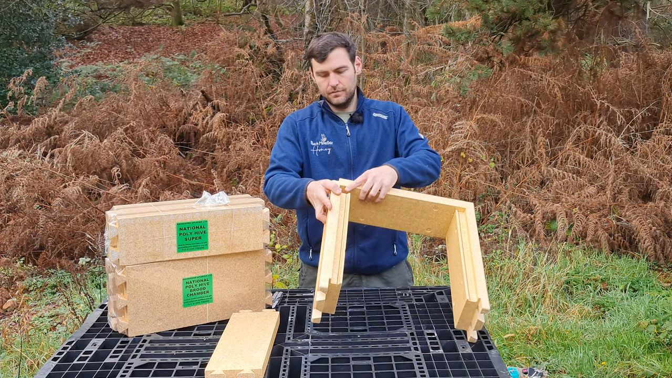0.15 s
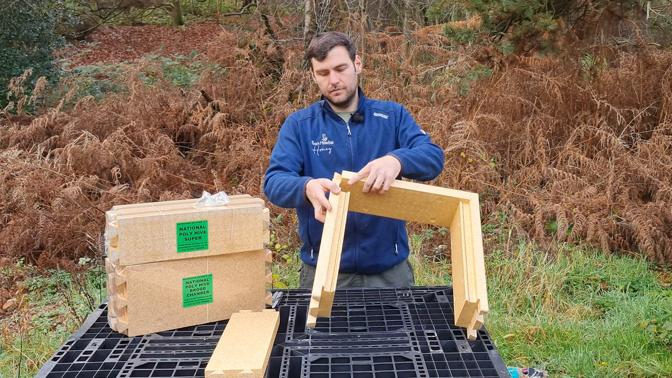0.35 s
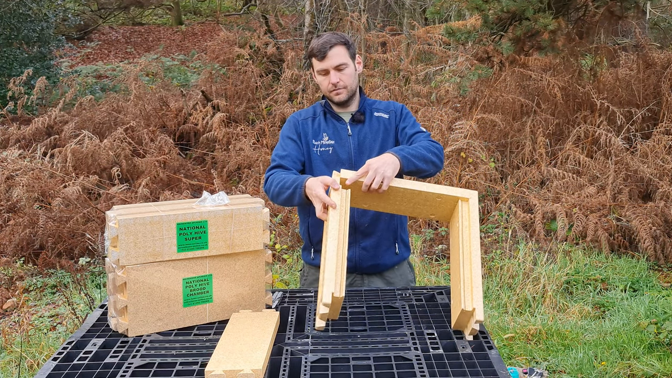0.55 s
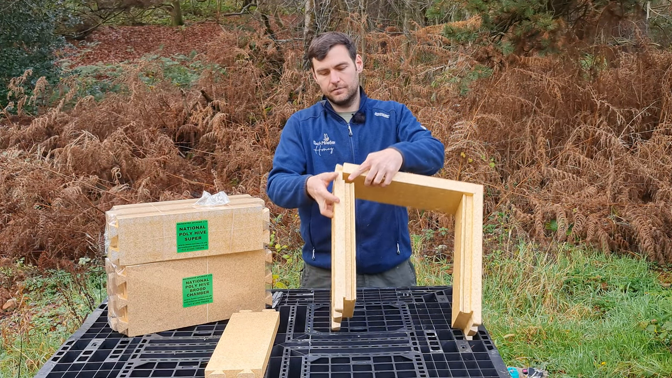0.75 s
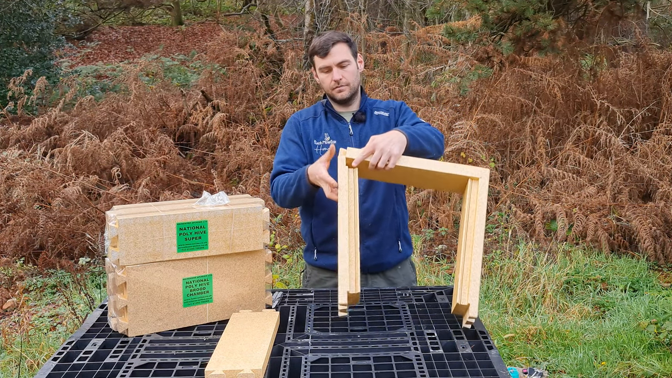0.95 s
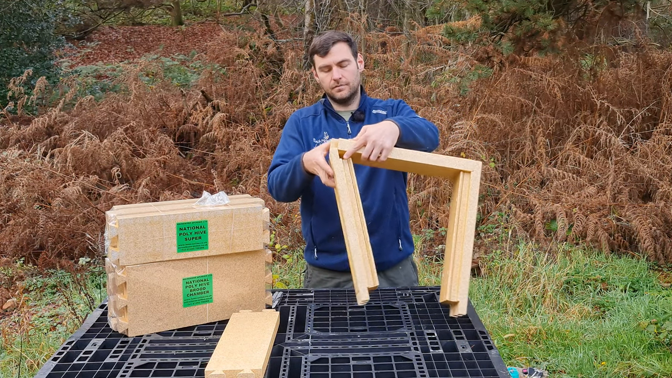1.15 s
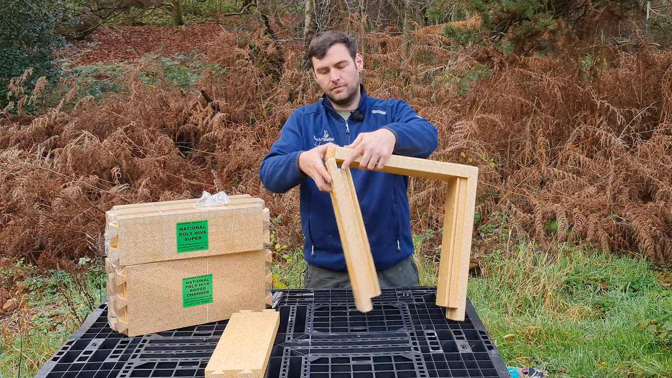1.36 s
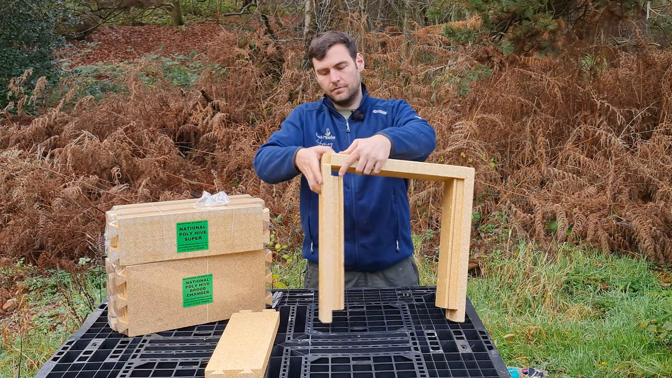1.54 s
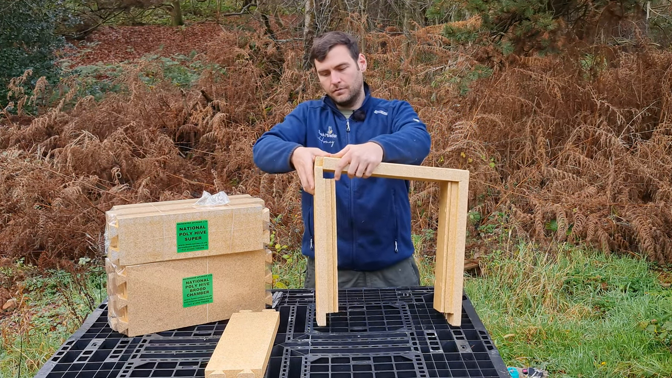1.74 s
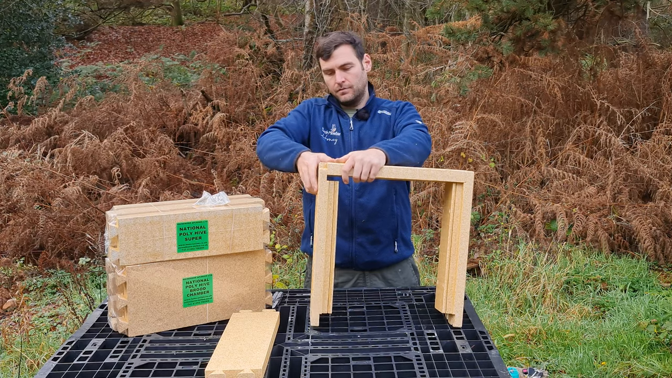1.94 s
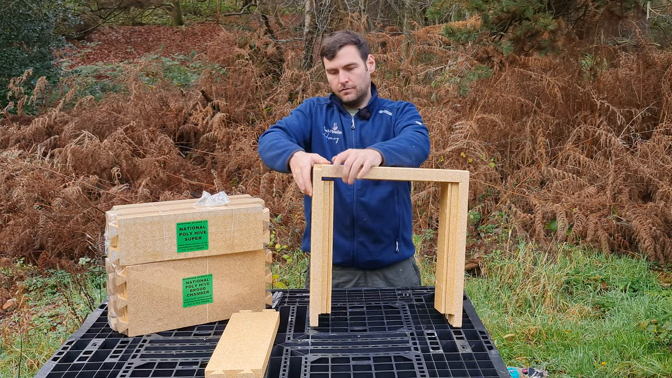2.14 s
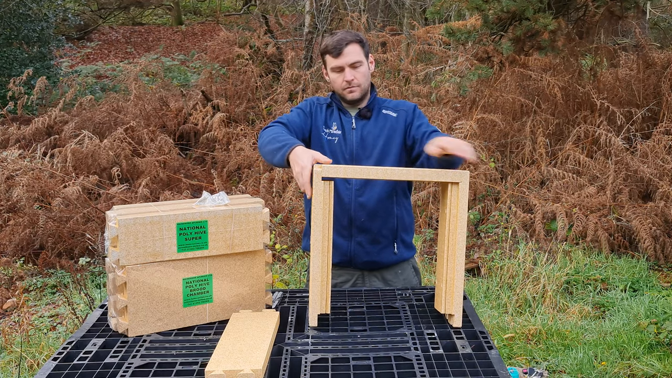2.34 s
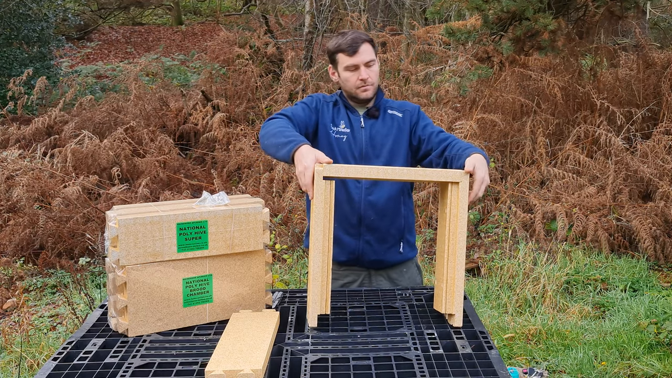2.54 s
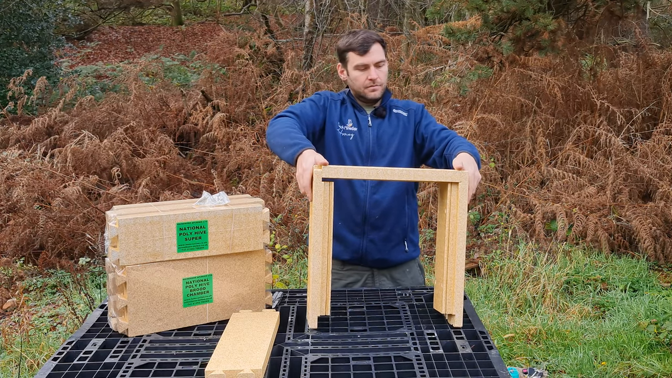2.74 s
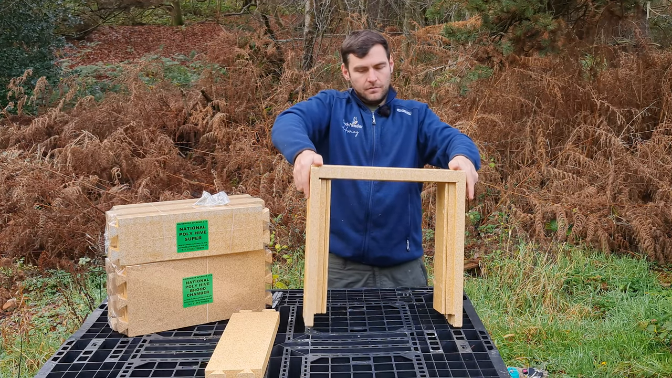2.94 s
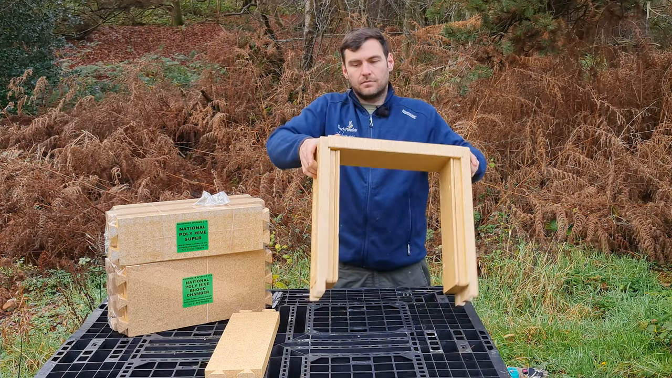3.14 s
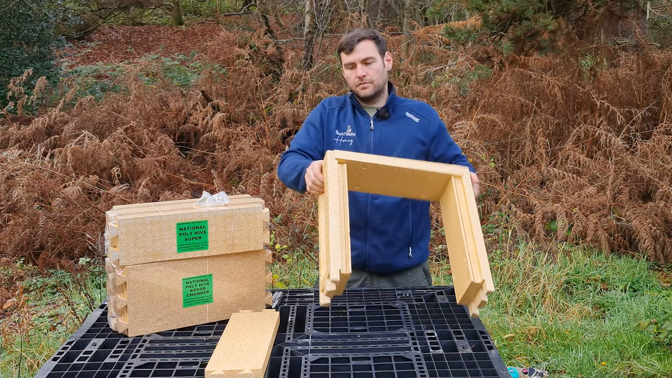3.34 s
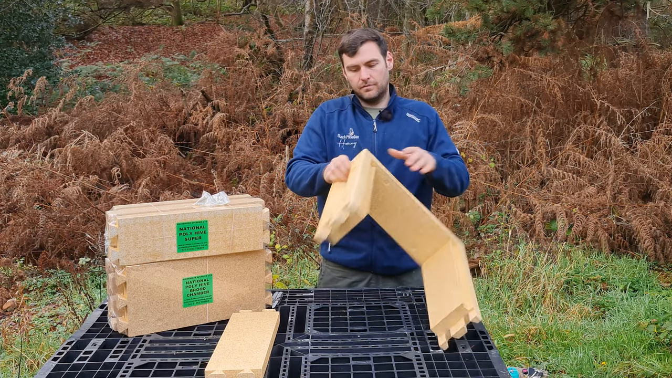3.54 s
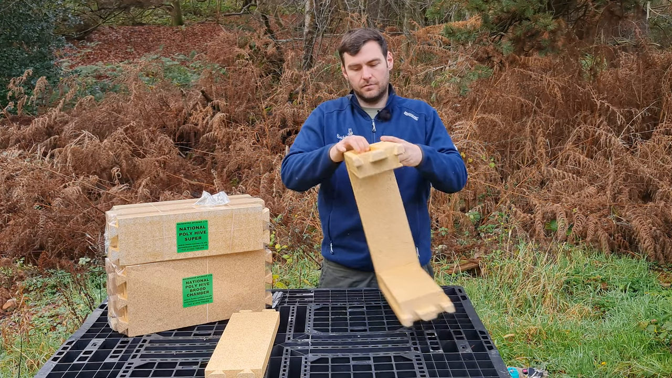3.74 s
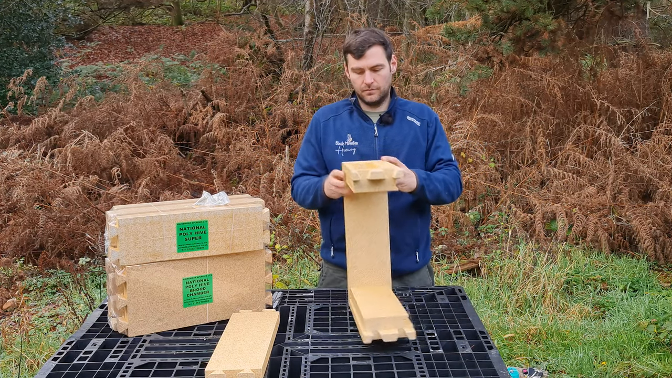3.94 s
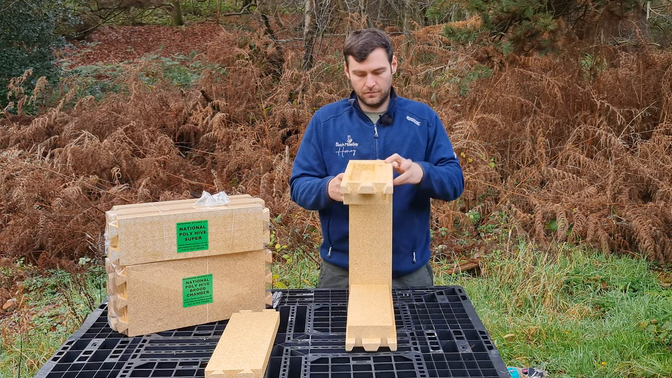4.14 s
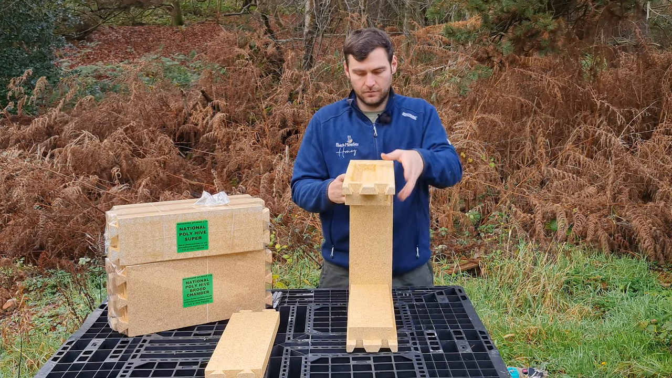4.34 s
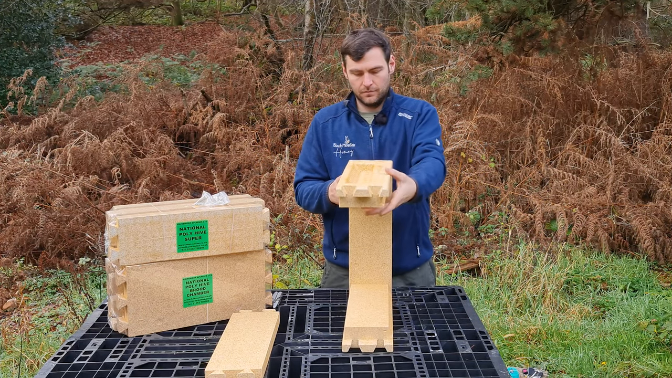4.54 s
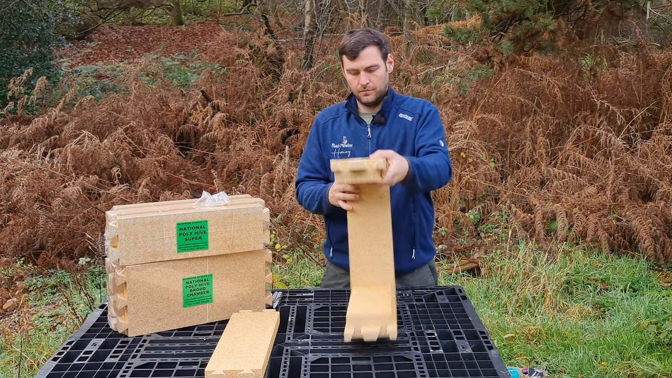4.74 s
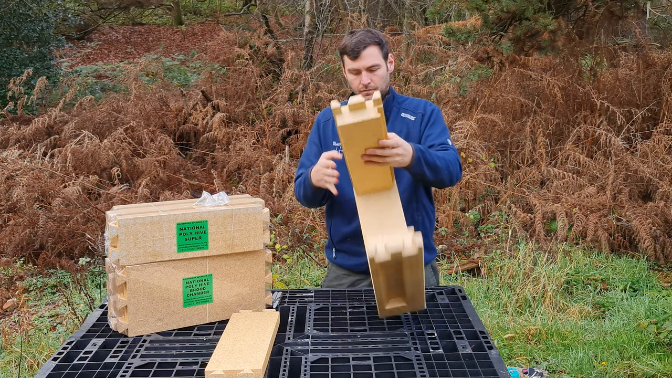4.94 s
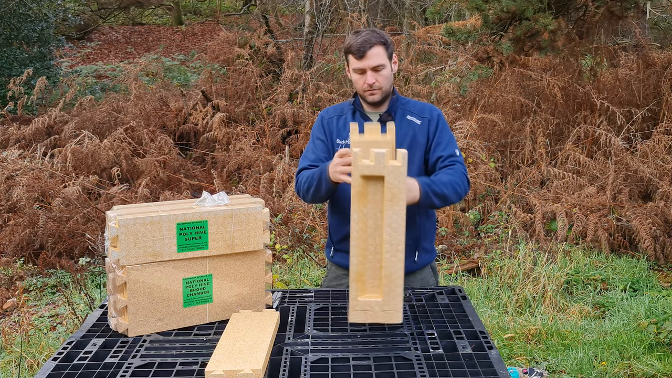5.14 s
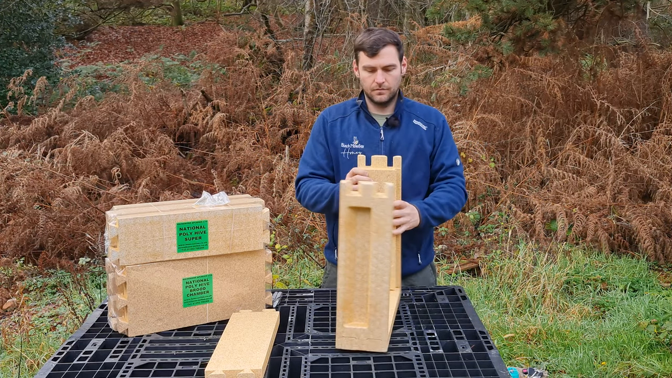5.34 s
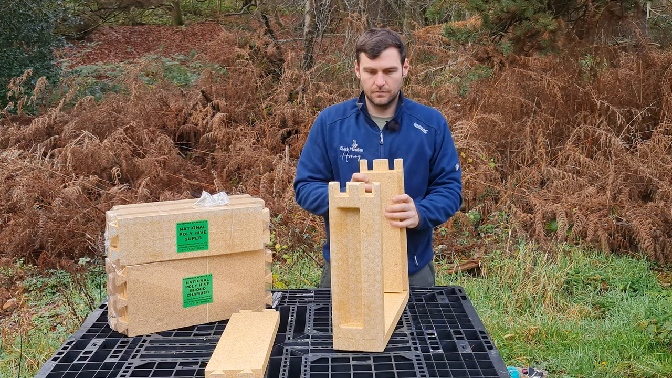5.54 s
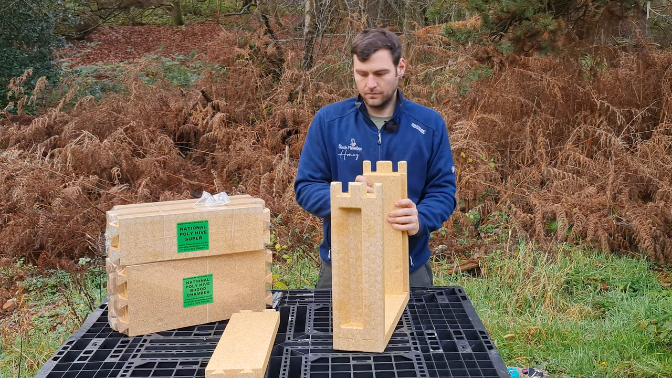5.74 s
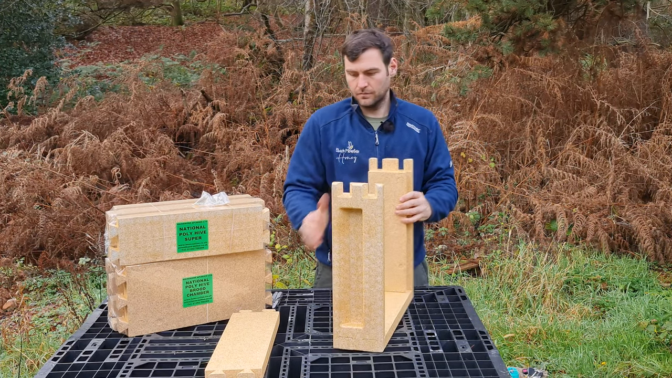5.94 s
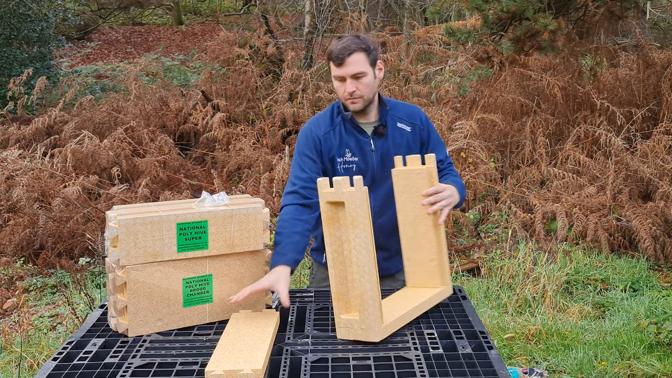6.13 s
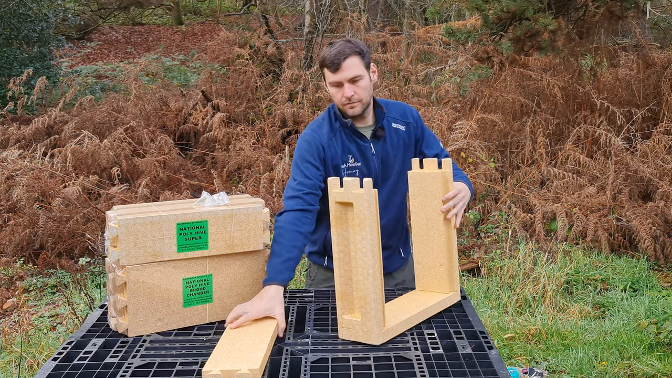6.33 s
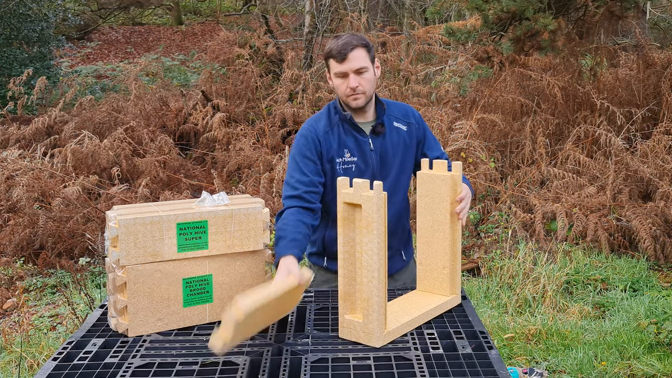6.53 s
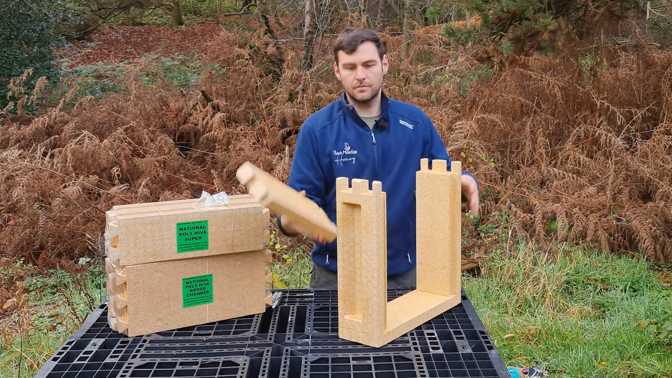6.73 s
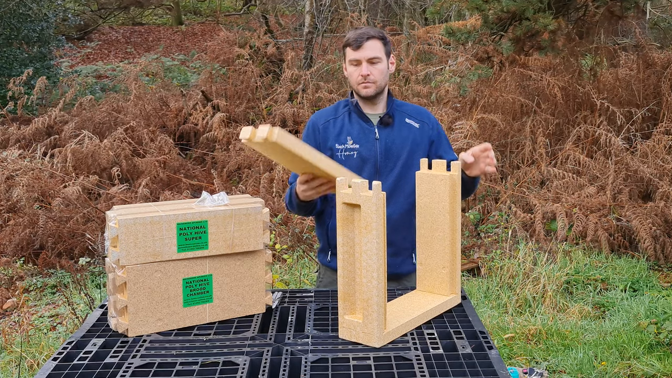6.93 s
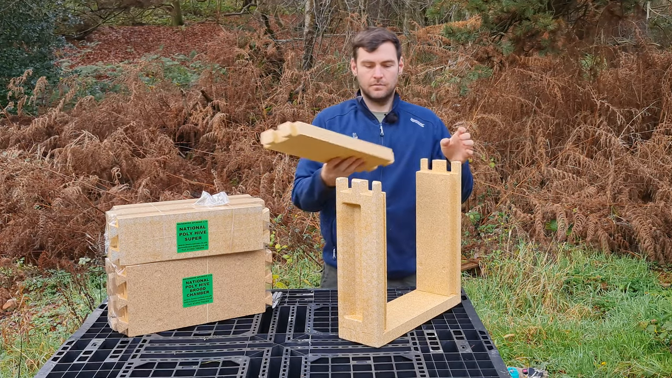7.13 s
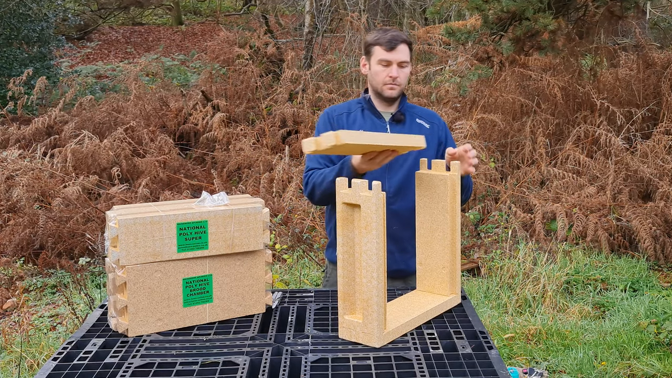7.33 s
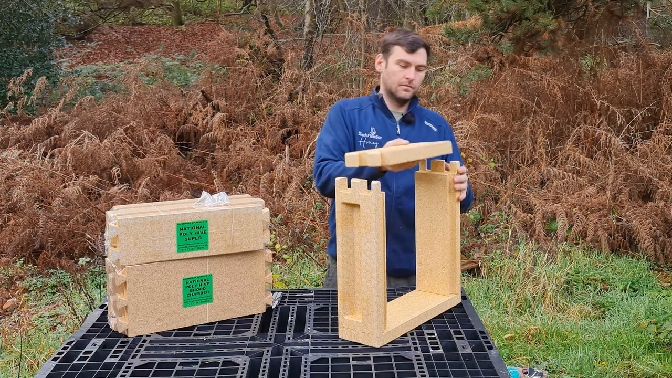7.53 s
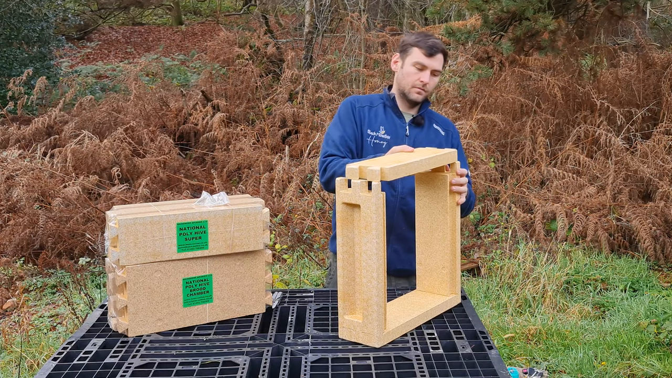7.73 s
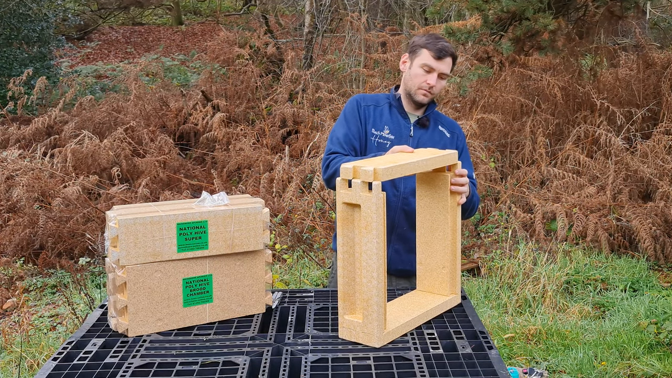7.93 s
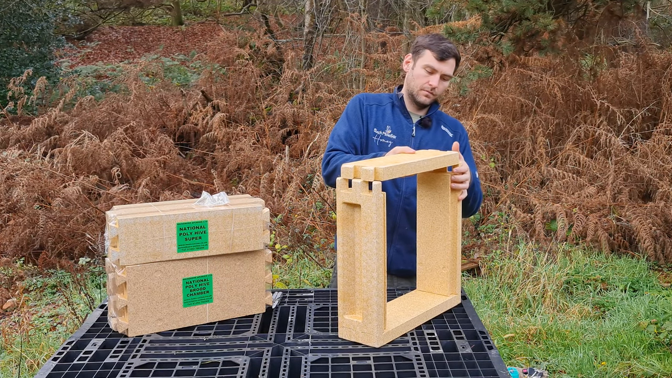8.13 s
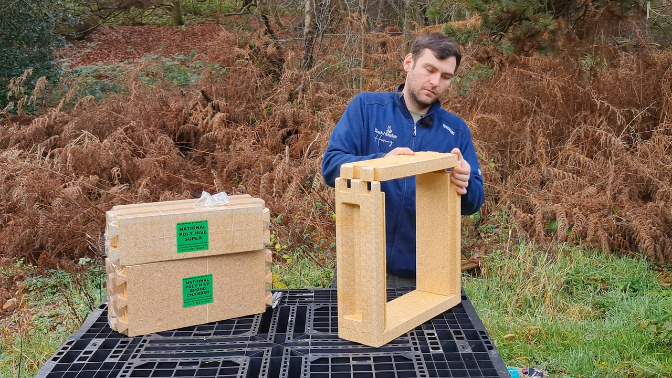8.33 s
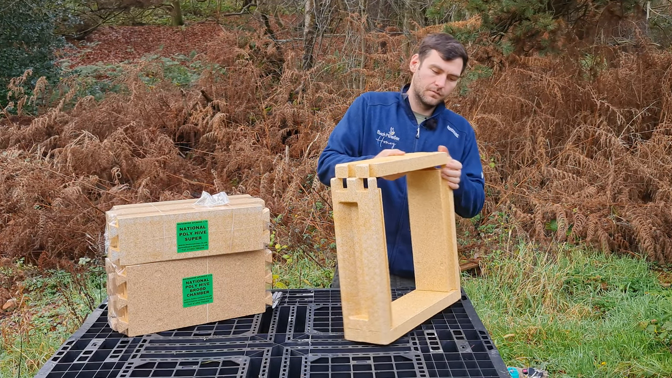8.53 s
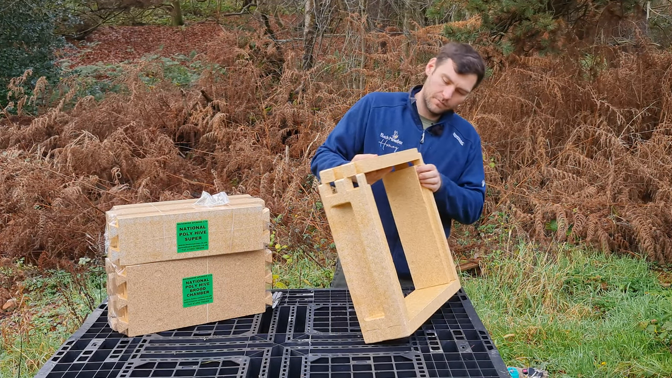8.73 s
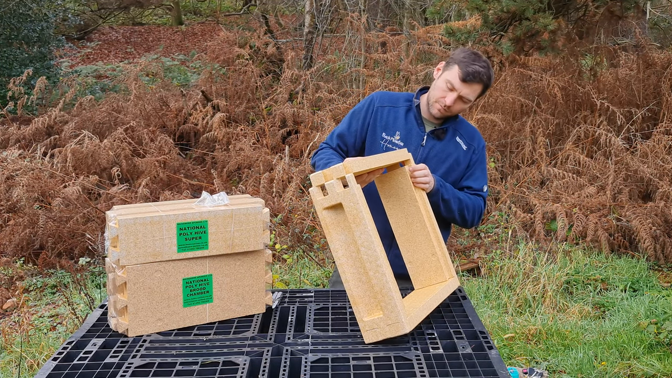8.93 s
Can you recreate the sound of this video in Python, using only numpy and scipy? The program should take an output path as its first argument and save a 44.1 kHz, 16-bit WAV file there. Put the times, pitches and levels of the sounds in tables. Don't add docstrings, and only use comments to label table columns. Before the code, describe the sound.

Very close and dry, outdoors, with only a faint leafy hiss behind. From 0 to 1.4 s light foam panels rub softly, with crisp grainy brushes, a muted knock at 0.5 and faint creaks. Around 1.4 to 1.8 dry ticks and small taps gather; at 1.95 a scrape bursts into a sharp high squeak. Quieter handling follows, with a short rough scuff at 2.9. Light taps at 3.5 lead to a knock and bright chirp at 3.96, then a full hollow knock at 4.23 and a softer one at 4.6. At 5.2 a dull bump precedes the loudest clack at 5.39, woody and briefly ringing, with quick rattling contacts until 5.7. Little creaks and a hollow knock come at 6.0 to 6.3, then near quiet with faint wiping. From 7.7 panels tap together, knock with a squeak at 8.08, scrape strongly at 8.4 and fade by 9.

```python
import sys
import numpy as np
from scipy import signal
from scipy.fft import rfft, irfft, next_fast_len
from scipy.io import wavfile
from scipy.ndimage import uniform_filter1d, map_coordinates

SR = 44100
rng = np.random.default_rng(int(sys.argv[2]) if len(sys.argv) > 2 else 0)


def wav_record(signal):
    frames = np.transpose(np.atleast_2d(signal))
    bounded = np.clip(frames, -1, 1)
    quanta = np.round(bounded * 32767).astype(np.int16)
    wavfile.write(sys.argv[1], SR, quanta)


def ratio_of_db(decibels):
    return 10 ** (np.asarray(decibels, float) / 20)


N = 400286


def unit(x):
    return x / np.sqrt(np.mean(x ** 2) + 1e-20)


def coloured(x, spectrum):
    size = next_fast_len(len(x) + 8192)
    hz, db = np.transpose(spectrum)
    log_hz = np.log(np.fft.rfftfreq(size, 1 / SR) + 1)
    gain = ratio_of_db(np.interp(log_hz, np.log(hz), db, left=-120, right=-120))
    return unit(irfft(rfft(x, size) * gain, size)[:len(x)])


def wobble(rate_hz):
    knots = rng.standard_normal(int(N / SR * 400) + 4)
    return map_coordinates(knots, [np.arange(N) * rate_hz / SR])


def add_at(out, start_s, sound):
    out[..., round(start_s * SR):][..., :sound.shape[-1]] += sound


def friction():
    # hz, density_db (per Hz)
    rub_spectrum = [(530, -42), (900, -16.5), (972, -8.5), (1090, -8.5), (1510, -5), (1970, -2.5),
                    (2610, -2.5), (2820, -2), (3580, -4), (7000, -23), (9100, -52), (15400, -120)]
    hiss_spectrum = [(2650, -17.5), (4500, -1), (5930, -3), (6460, -4), (11500, -5.5), (15100, -11.5),
                     (16000, -13)]
    hollow_spectrum = [(160, -45), (280, -18), (477, -10), (546, -11), (619, -9.5), (683, -8.5), (886, -9),
                       (1030, -13), (1500, -13), (1950, -39.5), (3300, -120)]
    rumble_spectrum = [(21, -49.5), (35, -23), (86, 1), (150, -6), (201, -3.5), (233, -10.5), (330, -8),
                       (430, -37.5), (730, -120)]
    slow = handling()
    judder = ratio_of_db(2.3 * wobble(60) + 1.0 * wobble(250))
    rub_gain, hiss_gain, hollow_gain = np.sqrt(slow[:3] ** 2 + scrape_power() * judder ** 2)
    rub = rub_gain * coloured(resonant(grains(spread_db=2.0), depth_db=2.9), rub_spectrum)
    hiss = hiss_gain * coloured(resonant(grains(spread_db=2.0), depth_db=2.1), hiss_spectrum)
    hollow = hollow_gain * coloured(resonant(grains(spread_db=1.5), depth_db=3.9), hollow_spectrum)
    rumble = slow[3] * coloured(rng.standard_normal(N), rumble_spectrum) * ratio_of_db(2.5 * wobble(18))
    return rub + hiss + hollow + rumble


def grains(spread_db):
    return rng.standard_normal(N) * ratio_of_db(spread_db * rng.exponential(size=N))


def resonant(x, depth_db):
    z = signal.stft(x, nperseg=1024)[2]
    field = uniform_filter1d(rng.standard_normal(z.shape), size=3, axis=0)
    field = uniform_filter1d(field, size=7, axis=1)
    return signal.istft(z * ratio_of_db(depth_db * unit(field)), nperseg=1024)[1][:N]


def scrape_power():
    # start_s, length_s, rub_db, hollow_over_rub_db, peak_position (0-1)
    scrapes = [(0.794, 0.25, -63, -3, 0.83), (1.09, 0.1, -62, -9, 0.6), (1.368, 0.04, -51, -3.5, 0.1),
               (1.4, 0.045, -56, -3, 0.3), (0.84, 0.08, -62, -6, 0.6), (0.09, 0.055, -63, -9, 0.5),
               (5.46, 0.018, -42, 0, 0.4), (4.232, 0.035, -58, 6, 0.1), (4.6, 0.08, -68, 9, 0.4),
               (7.7, 0.035, -56, 8, 0.2), (7.772, 0.04, -54, 8, 0.2), (6.03, 0.08, -57, -3, 0.75),
               (1.585, 0.014, -45, -6.5, 0.39), (1.713, 0.073, -57, 5.5, 0), (1.893, 0.07, -41, -6.5, 0.37),
               (2.04, 0.073, -45, -1.5, 0.5), (2.576, 0.028, -55.5, -5.5, 0),
               (2.876, 0.036, -40.5, -8.5, 0.38), (2.921, 0.032, -50, -1.5, 0.05),
               (0.15, 0.14, -67, 3, 0.2), (1.94, 0.052, -44, -16, 0.65), (3.58, 0.016, -49.5, 2.5, 0.24),
               (4.028, 0.12, -55.5, -3, 0.3), (6.159, 0.036, -51, -21.5, 0.54), (6.188, 0.15, -61, -5, 0.6),
               (7.78, 0.12, -55.5, -6, 0.4), (8.299, 0.044, -45, -12, 0.44),
               (8.364, 0.11, -38.5, -13.5, 0.53)]
    brushes = [(0, 0.013, -64.5, -3.5, 0.4), (0.057, 0.03, -56, -8, 0.62), (0.225, 0.115, -53.5, -21, 0.7),
               (0.392, 0.065, -52.5, -25, 1), (0.511, 0.008, -55, -9, 0.4), (2.742, 0.015, -63, -11, 0.63),
               (3.55, 0.0073, -60.5, -8, 0.31), (3.607, 0.015, -60.5, -6, 0.37),
               (4.035, 0.01, -58, -7, 0.4), (4.093, 0.015, -54.5, -4, 0.4), (5.663, 0.02, -36, -12, 0.5),
               (0.552, 0.068, -53, -1, 0.83), (0.675, 0.043, -61.5, 6, 0.99), (1.258, 0.13, -70, 1.5, 0),
               (1.645, 0.036, -58, 4, 0.052), (2.657, 0.049, -57.5, -30, 0.55), (3.972, 0.059, -46, 4.5, 0),
               (4.675, 0.087, -53.5, 1, 0.68), (4.819, 0.058, -57.5, -11.5, 0.36),
               (5.656, 0.012, -41, 1.5, 1), (6.026, 0.014, -57, -1, 0.3), (6.045, 0.035, -59, 8, 0.7),
               (6.082, 0.026, -53, -5, 0.15), (6.125, 0.022, -61, -16, 0.7), (6.167, 0.011, -54, -19, 0.35),
               (6.2, 0.02, -58, -6, 0.5), (6.425, 0.045, -67.5, 7, 0.56), (7.549, 0.099, -67.5, -18, 0),
               (7.891, 0.04, -48.5, -0.5, 0.73), (7.977, 0.029, -49.5, -6, 0.41),
               (8.082, 0.024, -38.5, -2.5, 0.088), (8.18, 0.11, -57, -28, 0.51),
               (8.566, 0.099, -60.5, -12, 0.42), (8.661, 0.17, -63, -8.5, 0.12)]
    wipes = [(1.11, 0.08, -60, -11, 0.8), (1.53, 0.04, -68, -9, 0.6), (0.24, 0.09, -62, -25, 0.4),
             (0.057, 0.025, -62, -20, 0.5), (1.928, 0.056, -44.5, -9.5, 0.84),
             (3.045, 0.14, -60, -3.5, 0.52), (3.319, 0.14, -62.5, -24, 0.6), (3.686, 0.05, -61.5, -22, 0),
             (3.758, 0.14, -60, -3, 0.43), (3.887, 0.066, -56, -7.5, 0.99),
             (5.078, 0.15, -57.5, -4.5, 0.38), (5.212, 0.062, -53.5, -22, 0.3),
             (5.813, 0.24, -65.5, -15, 0.2), (6.549, 0.058, -71, 2, 0.11), (6.79, 0.19, -66.5, -11.5, 0.67),
             (3.518, 0.018, -57.5, -18, 0.19), (3.682, 0.0087, -58, -20, 0.43)]
    shuffles = [(0.48, 0.055, -74, 0, .35), (.74, 0.19, -66, -0.5, .5), (1.5, 0.24, -67, -0.5, 0.42),
                (1.93, 0.35, -68.5, -2, 0.35), (3.0, 0.17, -61, -20, 0.63), (3.25, 0.21, -62.5, -2, 0.21),
                (3.96, 0.13, -56.5, -12, 0.21), (4.56, 0.12, -64.5, -1.5, 0.15),
                (5.39, 0.22, -54.5, -17.5, .15), (5.96, 0.38, -62.5, 0.5, 0.3), (6.2, 0.44, -71.5, 3, 0.12),
                (7.79, 0.11, -66, -8, 0.93), (8.0, 0.21, -75, 11, 0.56)]
    plateau = 0.15
    total = np.zeros((3, N + SR))
    for rows, hiss_over_rub_db in [(scrapes, -14), (brushes, -7.5), (wipes, 0.4), (shuffles, -3.5)]:
        for start_s, length_s, rub_db, hollow_db, top in rows:
            u = np.linspace(0, 1, int((0.96 * length_s + 0.013) * SR))
            top = np.clip(top, .05, .95)
            tent = np.where(u < top, u / top, (1 - u) / (1 - top))
            shape = np.sin(np.pi / 2 * tent) ** (2.0 + 0.081 / length_s)
            shape = shape + plateau * np.clip(np.minimum(u, 1 - u) * length_s / .011, 0, 1) ** 3
            layer_db = rub_db - 0.5 + np.array([[0], [hiss_over_rub_db], [hollow_db]])
            add_at(total, max(start_s - .008, 0), ratio_of_db(layer_db) ** 2 * shape)
    return total[:, :N]


def handling():
    # time_s, grip_movement_db
    grip = [(0.0, -63.5), (0.48, -60), (1.26, -73), (1.59, -65), (2.45, -66.5), (4.02, -67), (4.34, -69),
            (4.77, -64), (5.08, -70), (5.33, -62.5), (5.78, -63.5), (6.16, -66), (6.64, -67.5),
            (7.751, -73), (7.93, -63.5), (8.54, -63.5), (8.941, -81), (9.07, -91)]
    # start_s, peak_db, length_s
    leans = [(0.037, -63, 0.11), (0.27, -53, 0.071), (0.599, -58, 0.098), (0.686, -60, 0.086),
             (0.795, -61.5, 0.16), (1.168, -68, 0.08), (1.42, -53, 0.055), (1.765, -58, 0.069),
             (1.903, -51, 0.093), (2.535, -68, 0.082), (2.886, -63, 0.062), (3.353, -71, 0.074),
             (3.703, -58.5, 0.099), (4.064, -53, 0.16), (4.59, -49, 0.11), (4.699, -53, 0.072),
             (5.204, -42.5, 0.069), (5.999, -55, 0.13), (6.268, -53, 0.11), (6.617, -62, 0.07),
             (6.918, -71, 0.15), (7.92, -55.5, 0.13), (8.373, -59, 0.11)]
    usual_grip_db, rumble_db = -71, -20
    rock_db, rock_peak_s, lean_db = -12, 0.039, -8.5
    time_s, grip_db = np.transpose(grip)
    swing_db = np.interp(np.arange(N) / SR, time_s, grip_db) - usual_grip_db
    layers_db = np.array([-3.5 + swing_db, -5 + 0.38 * swing_db, -6 + 1.16 * swing_db])
    foam = ratio_of_db(usual_grip_db + layers_db) * stillness()
    rocking = np.zeros(N + SR)
    u = np.arange(SR // 2) / (rock_peak_s * SR)
    for start_s, db, thud_db, *_ in blows():
        add_at(rocking, start_s, (ratio_of_db(db + thud_db + rock_db) * u * np.exp(1 - u)) ** 2)
    for start_s, db, length_s in leans:
        add_at(rocking, start_s, ratio_of_db(db + lean_db) ** 2 * np.hanning(int(length_s * SR)))
    rumble = np.sqrt(ratio_of_db(usual_grip_db + rumble_db + swing_db) ** 2 + rocking[:N])
    return np.vstack([foam, rumble])


def stillness():
    # start_s, length_s, rub_and_hollow_drop_db, hiss_drop_db
    pauses = [(0.018, 0.035, 5, 8), (0.09, 0.14, 0, 8), (0.34, 0.055, 2, 8), (0.453, 0.019, 2.5, 8),
              (1.006, 0.092, 3, 4), (2.0, 0.04, -3, 3), (2.64, 0.17, 5, -1), (2.817, 0.042, 9.5, 7),
              (3.185, 0.04, 6, 4), (3.735, 0.028, 1, 2), (4.28, 0.08, 7, 4), (4.419, 0.071, 6, 4),
              (5.575, 0.03, 5, 4), (5.744, 0.07, 9.5, 2), (6.61, 0.16, 9, 6), (1.195, 0.06, 4, 4),
              (1.79, 0.05, 3, 3), (8.504, 0.085, 6, 3.5)]
    drop_db = np.zeros((3, N))
    for start_s, length_s, dull_db, hiss_db in pauses:
        drop_db[:, round(start_s * SR):round((start_s + length_s) * SR)] = [[dull_db], [hiss_db], [dull_db]]
    return ratio_of_db(-uniform_filter1d(drop_db, size=500, axis=1))


def knocks():
    # hz, level_db, t60_s
    panel_modes = [(310, -9, .16), (441, -6, .17), (590, -4, .15), (770, -9, .12), (884, 0, .13),
                   (988, -2, .14), (1210, -10, .08), (1603, 1, .11), (1930, -9, .045), (2530, -13, .035),
                   (3090, -12, .03)]
    # hz, level_db, t60_s
    pallet_modes = [(105.4, -1.5, 0.19), (202, -2, 0.15), (78.4, -11, 0.084), (161, -6.5, 0.19)]
    # hz, density_db (per Hz)
    body_spectrum = [(150, -35.5), (260, -3), (500, -4.5), (900, -8.5), (1400, -10.5), (3200, -29)]
    # hz, density_db (per Hz)
    crack_spectrum = [(700, -25.5), (1500, -2.5), (3500, -1), (6000, -20), (15000, -22.5)]
    soft_rise_s = 0.0009
    low_pass = signal.butter(2, 950, fs=SR, output="sos")
    out, t = np.zeros(N + SR), np.arange(SR // 2) / SR
    for start_s, db, thud_db, crack_db, tone_hz, t60_s in blows():
        t60_s = max(t60_s, .02)
        contacts = rng.standard_normal(900) * ratio_of_db(9 * rng.exponential(size=900) - 60 * t[:900] / .04)
        contacts[0] = 2.4 * abs(contacts).max()
        struck = ring([(tone_hz, 0, t60_s), (1.7 * tone_hz, -7, 0.14 * t60_s)], t, 0.79)
        shared = ring(panel_modes, t, t60_s / .12, high_db=min(2.2 * crack_db, 2))
        modes = signal.fftconvolve(shared + 1.5 * struck, contacts)[:len(t)]
        rise_s = soft_rise_s * ratio_of_db(-0.55 * crack_db)
        modes = peak_one(modes * (1 - np.exp(-t / rise_s)))
        body = 0.33 * dying_noise(body_spectrum, t, 1.6 * t60_s) * (1 - np.exp(-t / .0015))
        deep = signal.sosfilt(low_pass, body)
        body = deep + 1.4 * (body - deep) * ratio_of_db(-60 * t / (1.1 * t60_s))
        thud = peak_one(ring(pallet_modes, t, t60_s / 0.23) * (1 - np.exp(-t / 0.0091)))
        crack = dying_noise(crack_spectrum, t, 0.31 * t60_s) * (1 - np.exp(-t / 0.00037))
        sound = modes + body + ratio_of_db(thud_db + 11.0) * thud + ratio_of_db(crack_db - 5.5) * crack
        add_at(out, start_s - .0008, ratio_of_db(db + 0.5) * sound)
    return out[:N]


def blows():
    # start_s, peak_db, edge_crack_db, strongest_tone_hz, t60_s
    drops = [(0.147, -49.5, -2, 480, 0.22), (0.487, -38, -9, 399, 0.12), (1.365, -51, 5.5, 850, 0.29),
             (1.639, -48, 4, 306, 0.093), (1.707, -45, 3, 750, 0.13), (1.997, -49.5, 5, 776, 0.076),
             (2.489, -59.5, 9, 770, 0.14), (3.517, -43, -2, 1087, 0.21), (3.578, -50, -1, 424, 0.13),
             (3.683, -59.5, -20, 493, 0.21), (3.963, -33.5, -4.5, 435, 0.16), (4.009, -40, -8, 301, 0.32),
             (5.464, -32.5, -3, 907, 0.14), (5.514, -34, -9.5, 390, 0.13), (5.674, -37, 6, 330, 0.085),
             (6.578, -56, 0, 448, 0.25)]
    panel_hits = [(0.689, -52, -4, 437, 0.057), (4.233, -26, -19.5, 536, 0.13),
                  (4.578, -42, -9.5, 498, 0.31), (5.213, -40.5, -26, 440, 0.084),
                  (5.3885, -15.5, 1.5, 904.5, 0.17), (5.607, -44, -10, 608, 0.08),
                  (6.081, -45.5, -3, 896, 0.46), (6.25, -29.5, -7, 622, 0.12), (7.697, -35, -2, 435, 0.065),
                  (7.714, -38.5, -23, 451, 0.056), (7.769, -35, -7, 470, 0.06),
                  (8.076, -29.5, -2, 434, 0.072)]
    kinds = [(drops, -10), (panel_hits, -27)]
    return sorted((start_s, db, thud_db, *rest) for rows, thud_db in kinds for start_s, db, *rest in rows)


def ring(modes, t, slower, high_db=0):
    hz, db, t60_s = np.transpose(modes)[:, :, None]
    strength, sign, detune = rng.standard_normal((3, len(modes), 1))
    lift_db = high_db * np.clip(np.log2(hz / 520) / 1.6, 0, 1)
    decay = ratio_of_db(db + lift_db + 1.5 * strength - 60 * t / (slower * t60_s))
    return (np.sign(sign) * decay * np.sin(2 * np.pi * hz * (1 + 0.006 * detune) * t)).sum(0)


def dying_noise(spectrum, t, t60_s):
    return coloured(rng.standard_normal(len(t)), spectrum) * ratio_of_db(-60 * t / t60_s)


def peak_one(x):
    return x / abs(x).max()


def rings():
    # start_s, peak_db, pitch_hz, t60_s
    tones = [(0.492, -37, 201.5, 0.25), (3.966, -41, 205.4, 0.33), (3.966, -39.5, 606, 0.12),
             (4.232, -29, 749, 0.084), (4.232, -39, 1170, 0.14), (4.234, -47.5, 202, 0.32),
             (4.39, -67.5, 1254, 0.2), (4.39, -66, 847, 0.28), (4.505, -60, 1240, 0.14),
             (4.585, -45, 769, 0.25), (4.59, -50, 205, 0.4), (5.39, -21, 1593, 0.1),
             (5.39, -27.5, 199, 0.19), (5.39, -32.5, 580, 0.16), (5.392, -36, 101.6, 0.5),
             (5.56, -45.5, 507, 0.1), (5.68, -47, 126, 0.12), (5.685, -46, 217, 0.14),
             (6.216, -45, 606, 0.1), (6.255, -37, 325, 0.15), (6.26, -54.5, 180, 0.6)]
    rise_cycles = 1.4
    out, t = np.zeros(N + SR), np.arange(SR // 2) / SR
    for start_s, db, hz, t60_s in tones:
        decay = ratio_of_db(db - 60 * t / t60_s)
        add_at(out, start_s, decay * np.sin(2 * np.pi * hz * t) * (1 - np.exp(-t * hz / rise_cycles)))
    return out[:N] * ratio_of_db(1.8 * wobble(70))


def squeaks():
    # start_s, length_s, pitch_hz, level_db, swell_share (of the length)
    slips = [(0.39, 0.072, 1330, -50, 0.8), (1.1, 0.09, 1530, -59, 0.8), (1.68, 0.03, 2700, -58, 0.5),
             (7.985, 0.01, 4800, -50, 0.4), (7.8, 0.12, 2800, -60, 0.8), (8.385, 0.07, 2600, -48, 0.6),
             (8.16, 0.1, 2800, -62, 0.3), (0.23, 0.05, 3200, -60, 0.4), (1.946, 0.024, 4460, -18.5, 0.29),
             (1.96, 0.032, 4710, -23, 0.21), (1.982, 0.021, 1306, -31.5, 0.12),
             (2.059, 0.018, 3930, -36.5, 0.87), (2.933, 0.035, 1127, -39.5, 0.26),
             (3.964, 0.026, 5175, -14.5, 0.11), (3.98, 0.018, 6210, -22, 0.072),
             (4.009, 0.012, 3260, -33, 0.19), (4.01, 0.014, 2350, -35.5, 0.26),
             (5.389, 0.0053, 3470, -20, 0.75), (5.664, 0.019, 2386, -26.5, 0.67),
             (5.666, 0.029, 9110, -33, 0.41), (6.073, 0.063, 884, -42, 0.21),
             (6.021, 0.071, 895, -50, 0.14), (6.78, 0.17, 890, -66, 0.85), (6.024, 0.02, 5930, -59, 0.44),
             (6.044, 0.028, 5800, -57, 0.7), (1.957, 0.018, 5220, -35, 0.45), (1.95, 0.035, 3500, -36, 0.5),
             (3.68, 0.012, 5500, -47, 0.3), (8.032, 0.02, 2550, -57, 0.4), (8.08, 0.028, 2580, -32.5, 0.1)]
    out = np.zeros(N + SR)
    drift, flutter_db = wobble(390), wobble(380)
    for start_s, length_s, hz, db, swell in slips:
        over_db = -21.5 + 12 * np.log2(hz / 2500)
        swell = np.clip(swell, .05, .95)
        u = np.arange(int(2.3 * length_s * SR)) / (length_s * SR)
        at = round(start_s * SR)
        span = slice(at, at + len(u))
        rise = np.sin(np.pi / 2 * u / swell) ** 2
        shape = np.where(u < swell, rise, ratio_of_db(-32 * (u - swell) / (1 - swell)))
        phase = 2 * np.pi * np.cumsum(hz * (1 + .012 * drift[span])) / SR
        overtones = np.cos(2 * phase) + 0.37 * np.cos(3 * phase) * (3 * hz < SR / 2)
        tone = np.cos(phase) + ratio_of_db(over_db) * shape * overtones * (2 * hz < SR / 2)
        band = signal.butter(1, [0.98 * hz, 1.03 * hz], "band", fs=SR, output="sos")
        uneven_slips = signal.sosfilt(band, rng.standard_normal(len(u))) * np.sqrt(SR / hz)
        out[span] += ratio_of_db(db + flutter_db[span]) * shape * (tone + 0.9 * uneven_slips)
    return out[:N]


def ticks():
    # start_s, peak_db, pitch_hz, t60_s
    catches = [(1.5883, -35.5, 2550, 0.03), (1.366, -46, 1600, 0.02), (1.6395, -46, 3600, 0.015),
               (1.676, -52, 2600, 0.01), (1.708, -39, 3500, 0.035), (1.7338, -38.5, 3320, 0.017),
               (1.751, -46, 3500, 0.025), (1.764, -34, 1430, 0.011), (2.576, -38, 1590, 0.0074),
               (2.9743, -37.5, 1590, 0.0036), (3.0224, -43.5, 1470, 0.017), (3.518, -35, 1474, 0.035),
               (3.681, -44, 3440, 0.032), (4.23, -37, 2000, 0.01), (4.253, -50, 2700, 0.034),
               (5.4645, -33, 1500, 0.02), (5.5154, -37, 2050, 0.037), (6.0294, -45, 1750, 0.031),
               (6.061, -41, 2200, 0.03), (6.144, -45, 2000, .015), (6.1663, -37, 2050, 0.02),
               (6.168, -40, 3180, 0.022), (4.255, -55, 2600, 0.08), (7.9844, -40.5, 1970, 0.037),
               (8.311, -40, 2900, 0.021), (8.59, -52, 2600, 0.03), (8.63, -52, 2000, 0.03),
               (8.885, -60, 3500, 0.03), (0.486, -44, 3200, 0.03)]
    out, t = np.zeros(N + SR), np.arange(2000) / SR
    for start_s, db, hz, t60_s in catches:
        snap = 0.5 * rng.standard_normal(len(t)) * ratio_of_db(-60 * t / (1.14 * t60_s))
        jitter_rad = 0.07 * np.cumsum(rng.standard_normal(len(t)))
        rib = np.sin(2 * np.pi * hz * t + jitter_rad) * ratio_of_db(-60 * t / t60_s)
        add_at(out, start_s, ratio_of_db(db) * (rib + snap) * (1 - np.exp(-t / (0.014 * t60_s))))
    return signal.sosfilt(signal.butter(2, 6000, fs=SR, output="sos"), out[:N])


def wood():
    # hz, density_db (per Hz)
    leaf_spectrum = [(2800, -32), (3900, -6), (4300, -1), (5200, -13)]
    level_db, fade_s = -81, 0.18
    fade = np.clip((N - np.arange(N)) / (fade_s * SR), 0, 1) ** 2
    return fade * stillness()[1] * ratio_of_db(level_db) * coloured(rng.standard_normal(N), leaf_spectrum)


def scene():
    near = friction() + knocks() + rings() + squeaks() + ticks()
    return (near + wood())[None]


def roll_off(x):
    return signal.sosfilt(signal.butter(12, 16960, fs=SR, output="sos"), x)


def record(dry):
    low_cut = signal.butter(4, 55.4, "high", fs=SR, output="sos")
    top_cut = signal.cheby2(10, 45, 16900, fs=SR, output="sos")
    mix = signal.sosfilt(np.vstack([low_cut, top_cut]), dry)
    return roll_off(mix)


dry = scene()
out = record(dry)
wav_record(out)
```